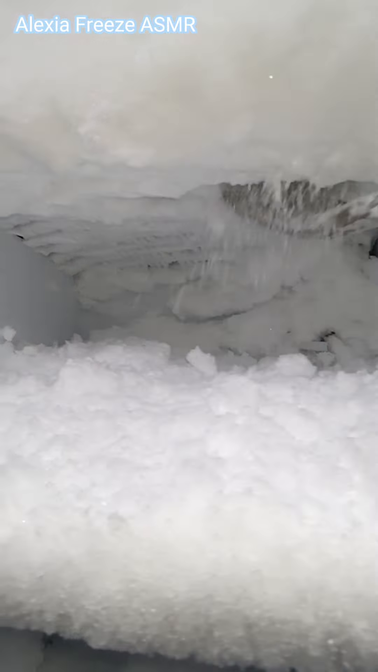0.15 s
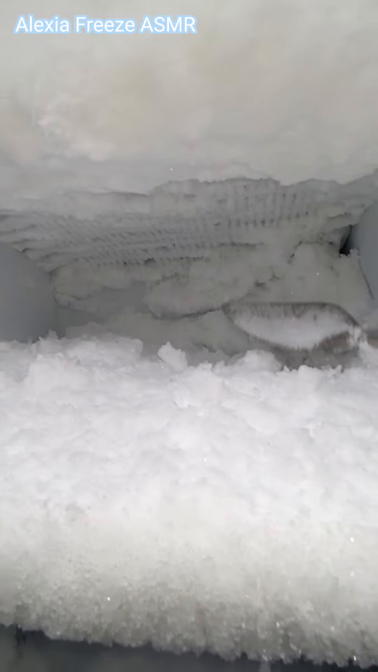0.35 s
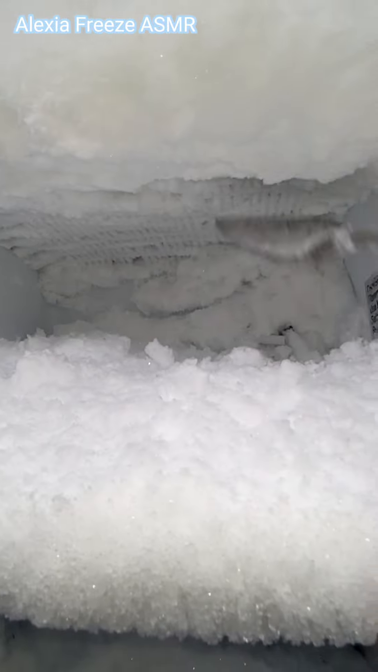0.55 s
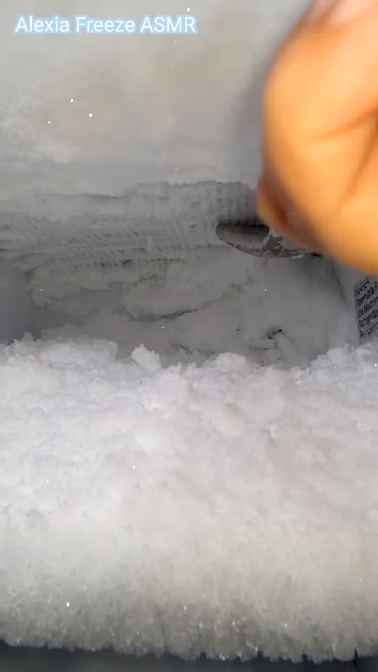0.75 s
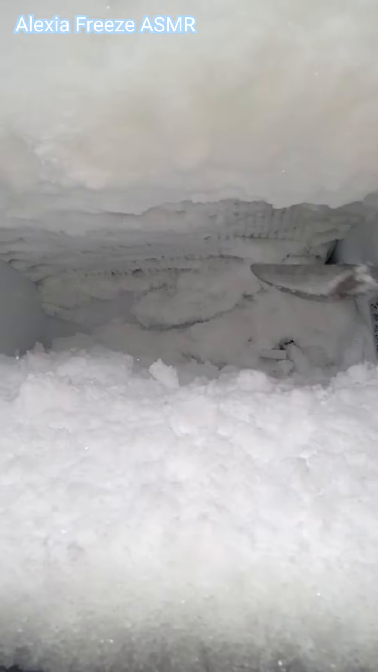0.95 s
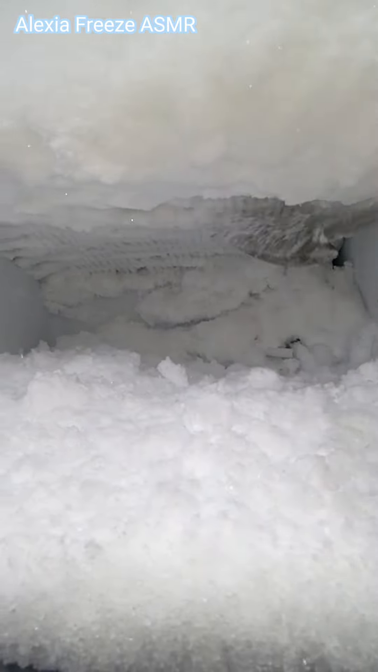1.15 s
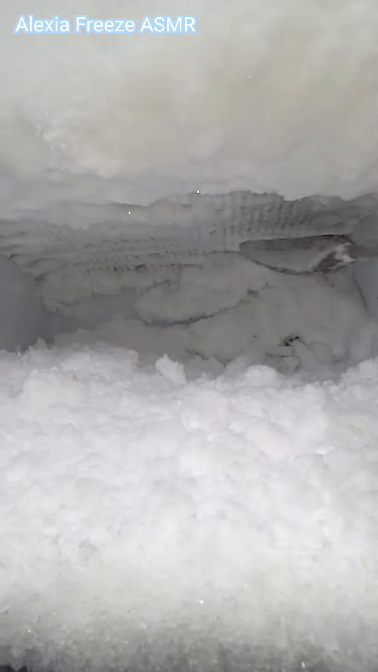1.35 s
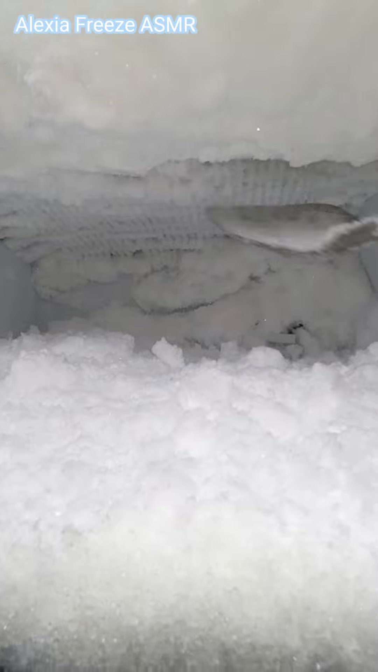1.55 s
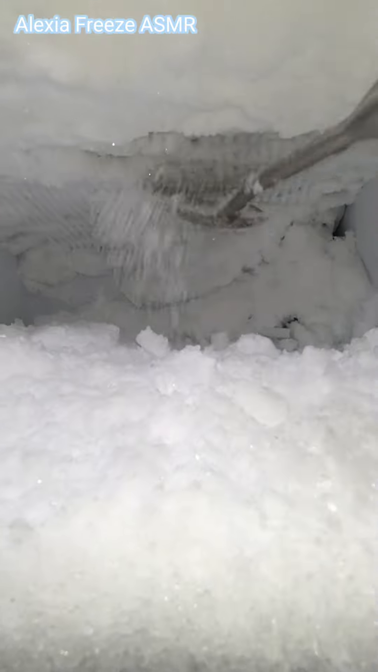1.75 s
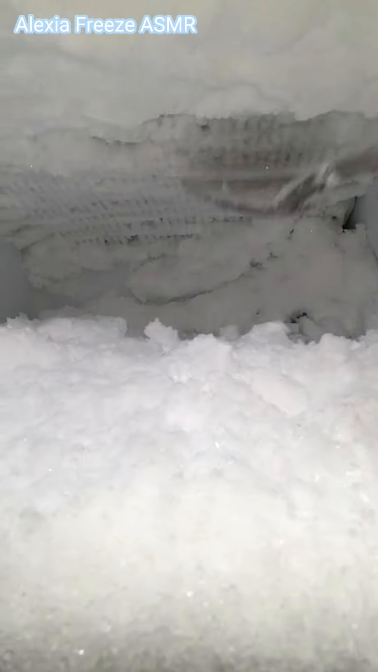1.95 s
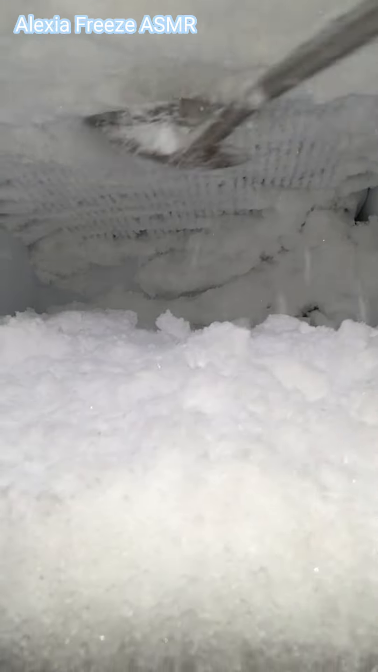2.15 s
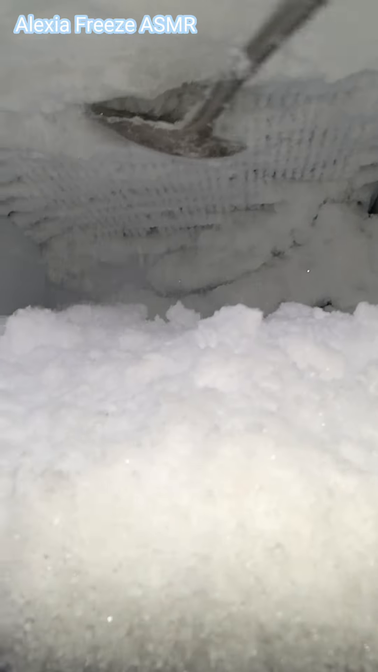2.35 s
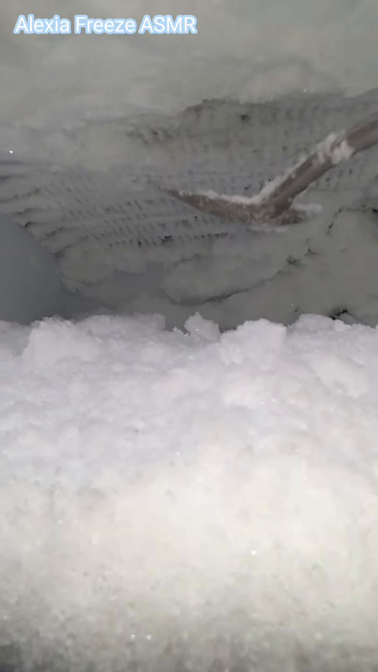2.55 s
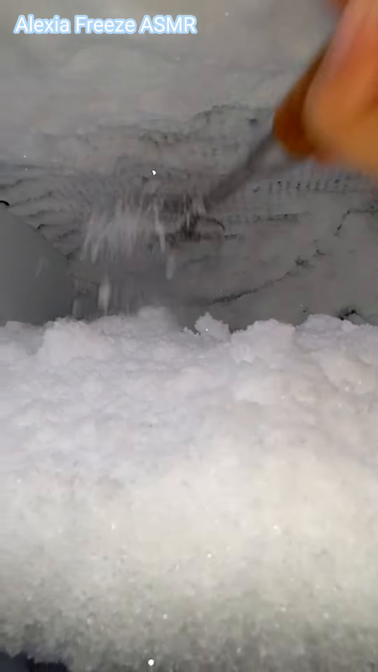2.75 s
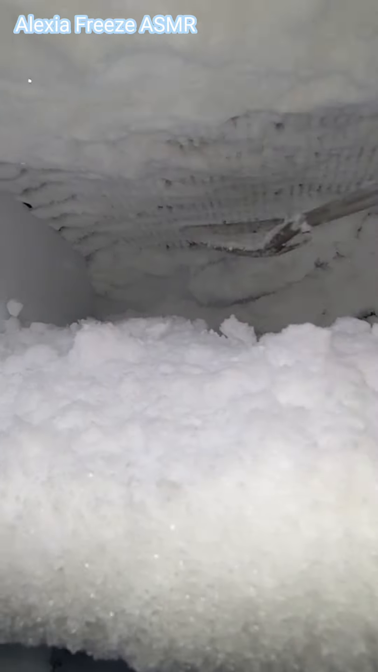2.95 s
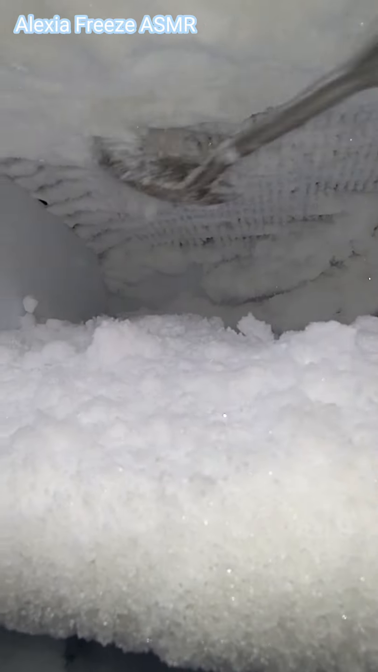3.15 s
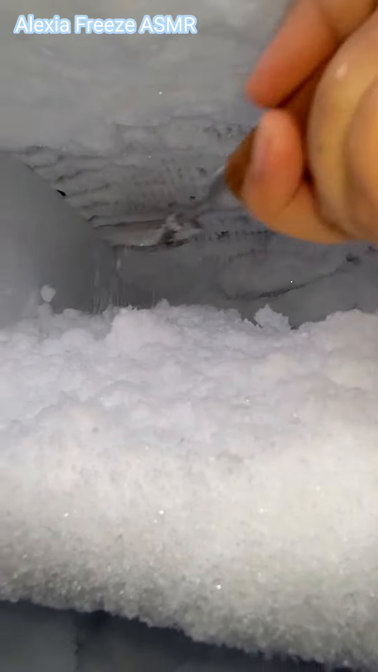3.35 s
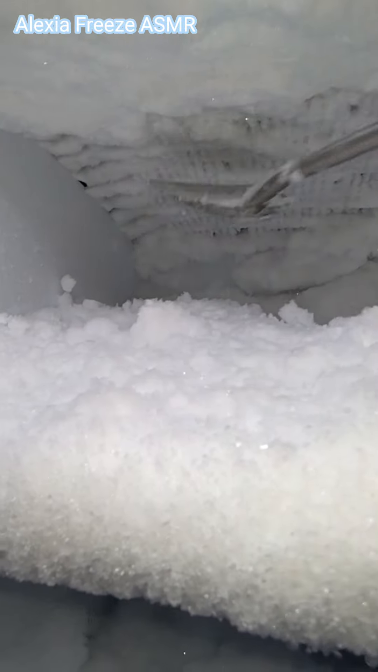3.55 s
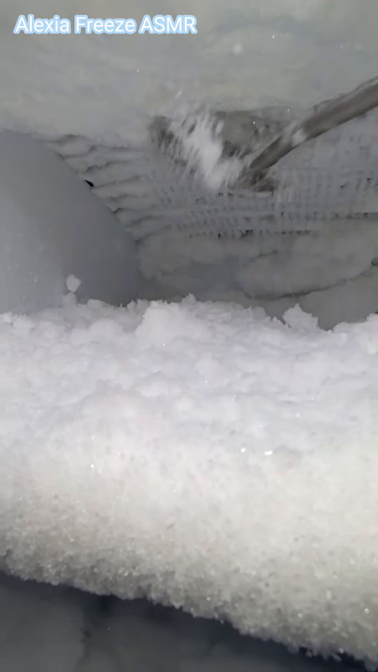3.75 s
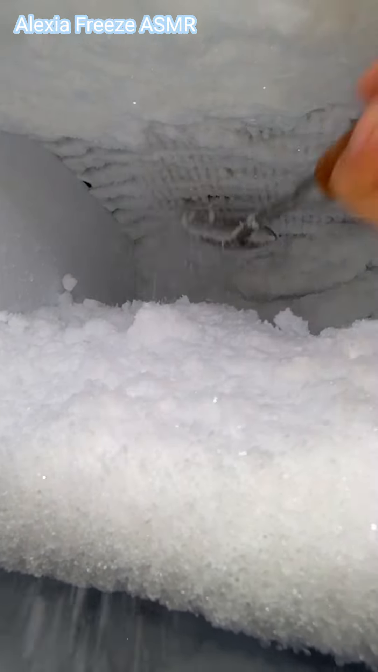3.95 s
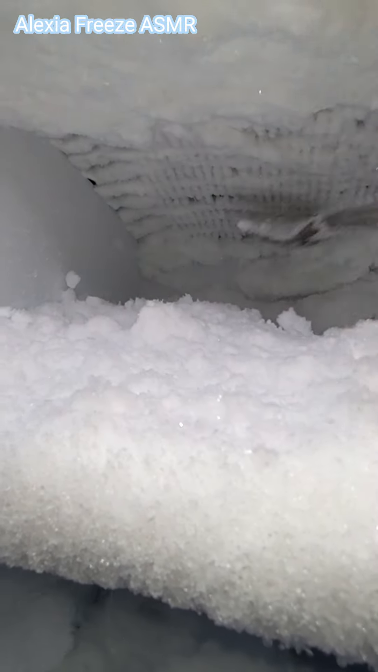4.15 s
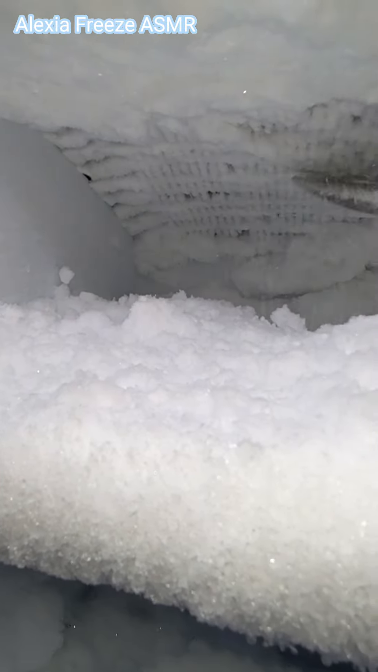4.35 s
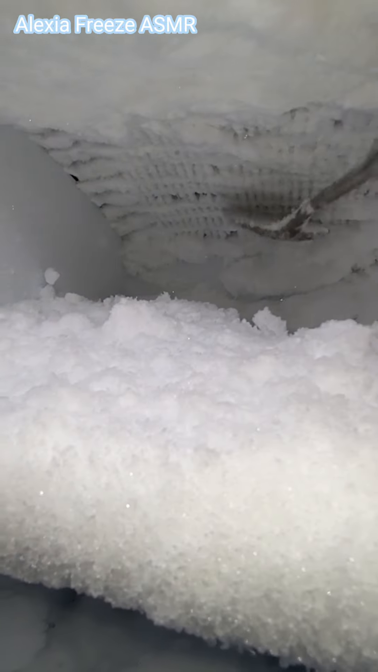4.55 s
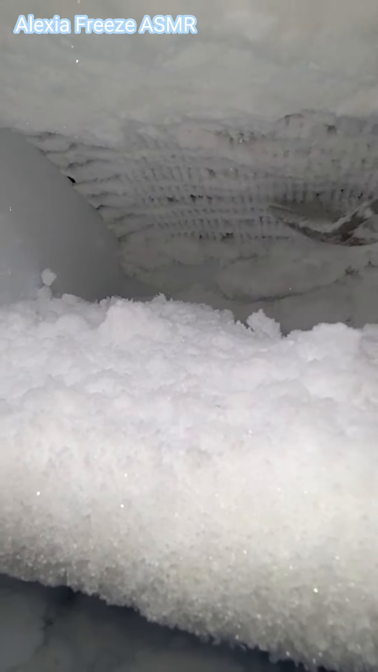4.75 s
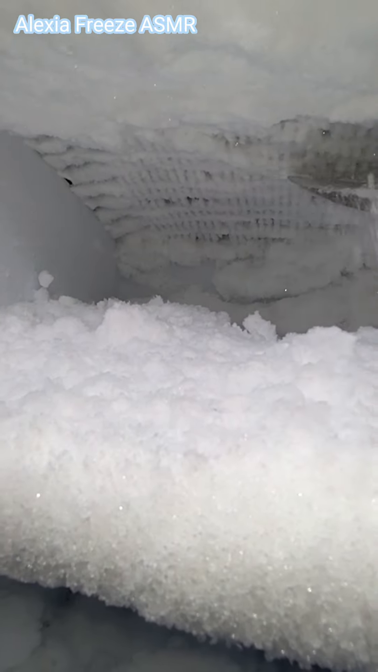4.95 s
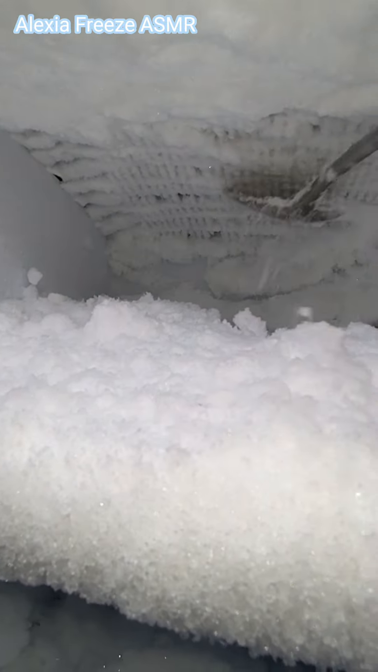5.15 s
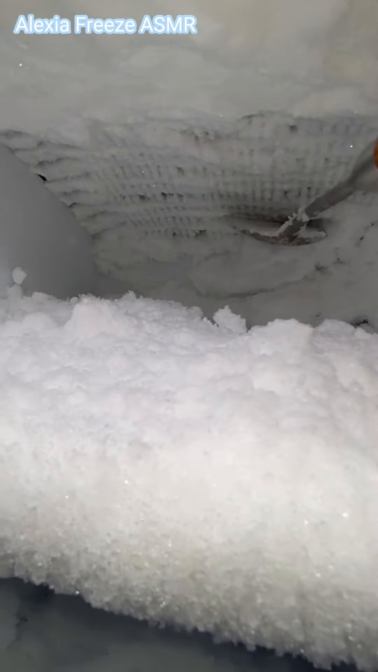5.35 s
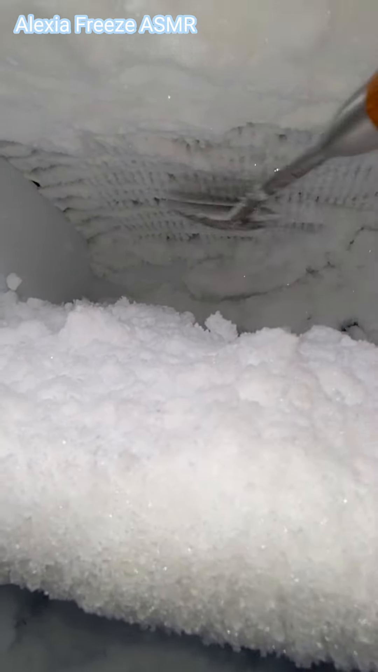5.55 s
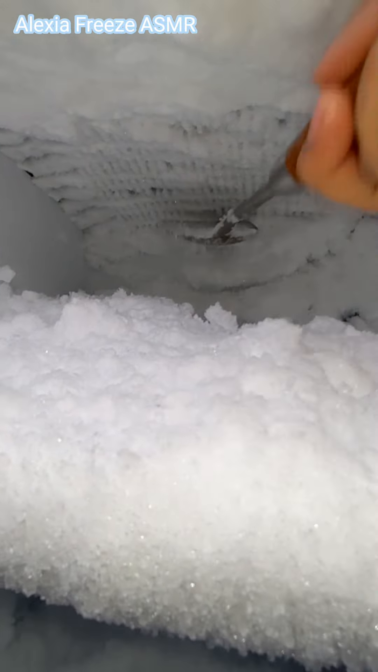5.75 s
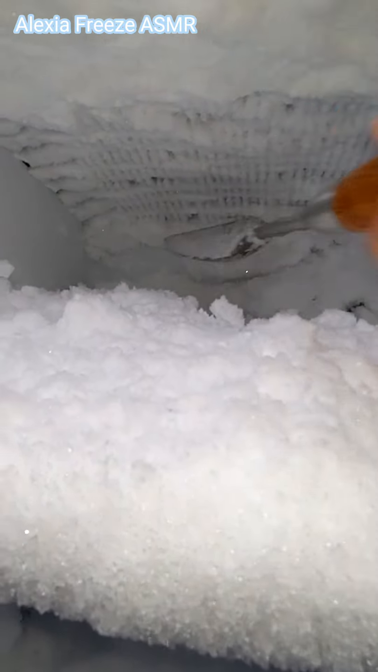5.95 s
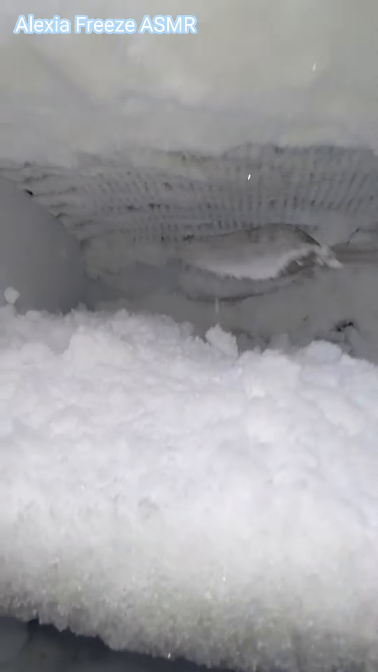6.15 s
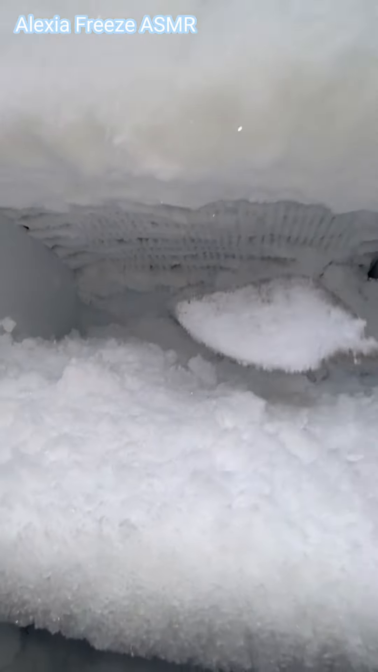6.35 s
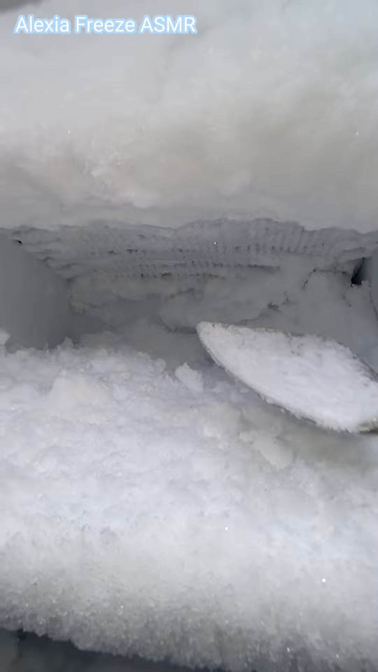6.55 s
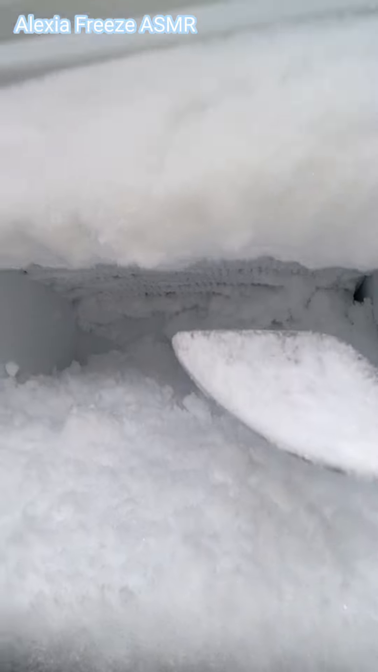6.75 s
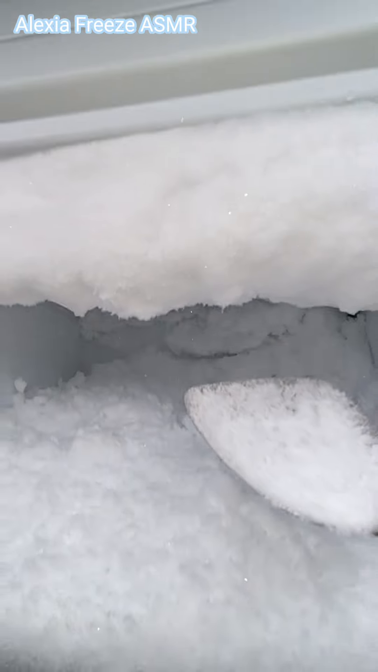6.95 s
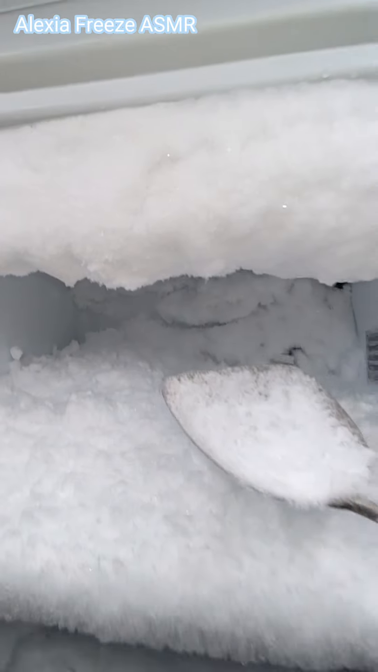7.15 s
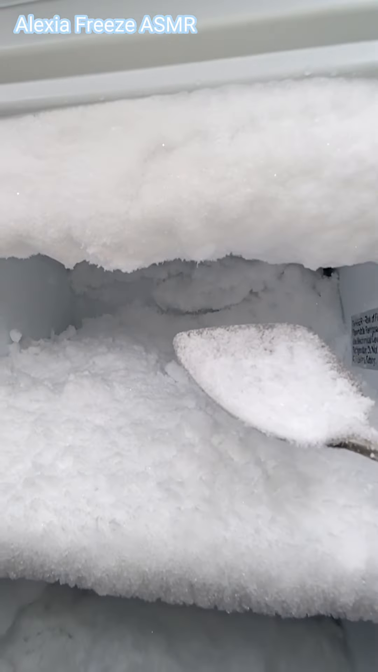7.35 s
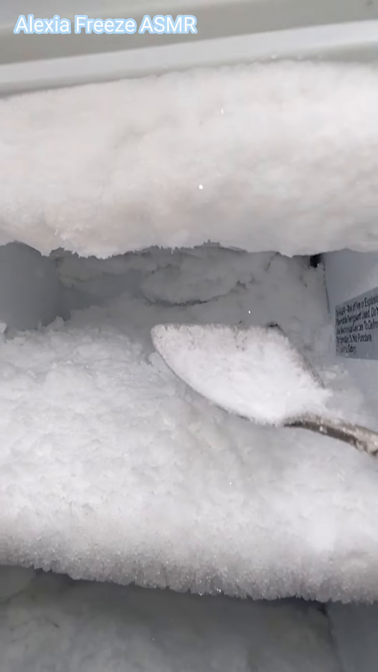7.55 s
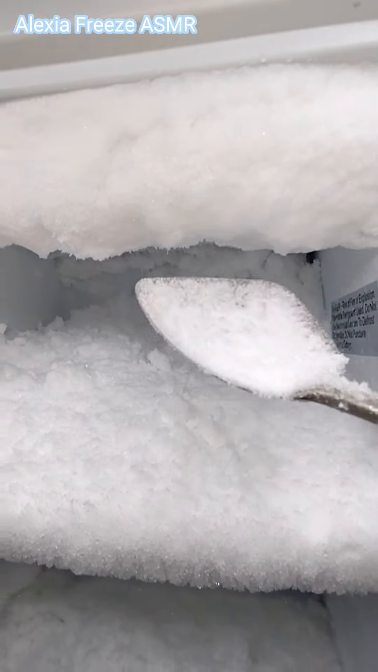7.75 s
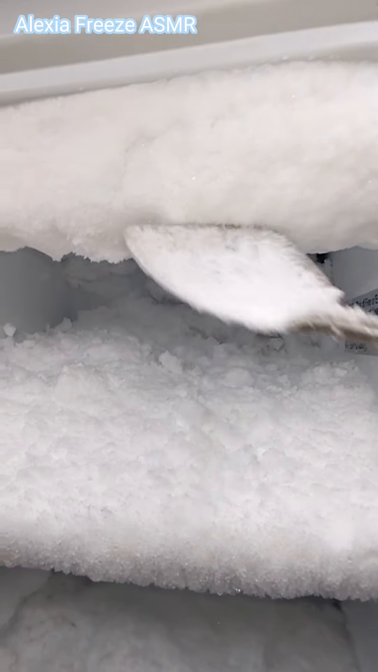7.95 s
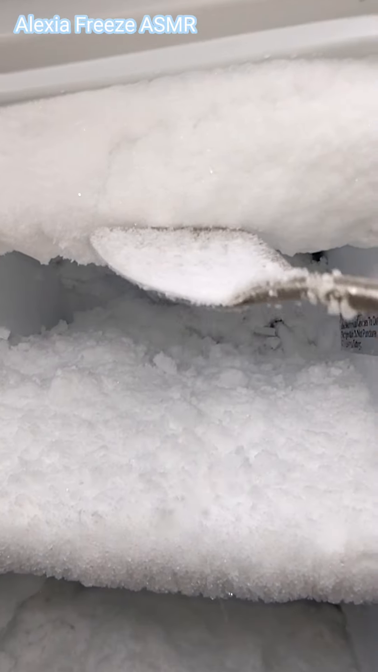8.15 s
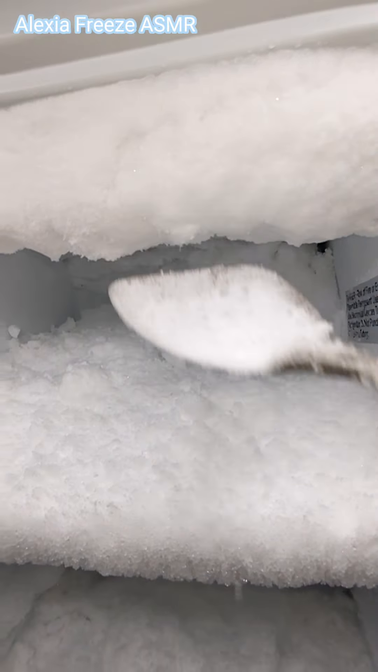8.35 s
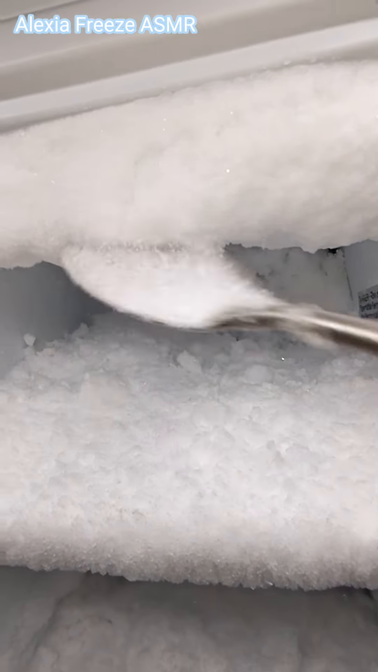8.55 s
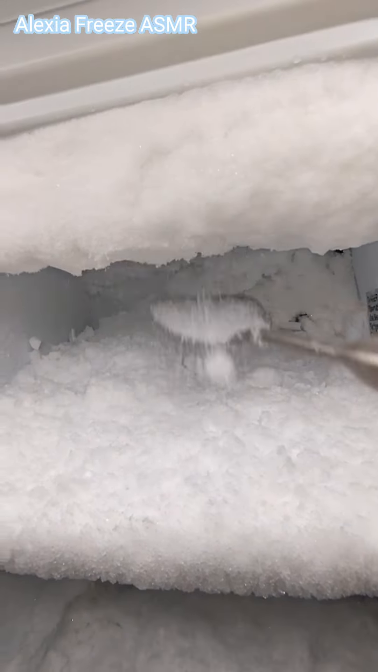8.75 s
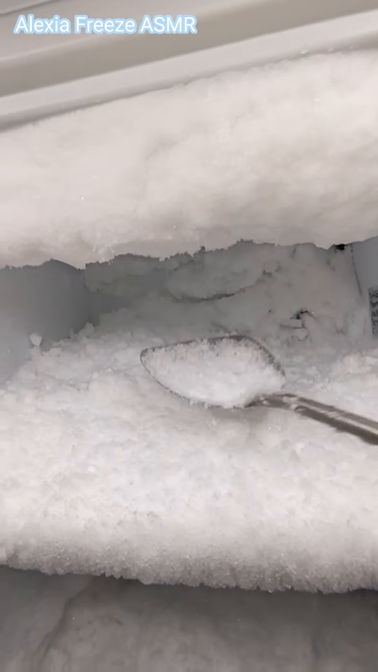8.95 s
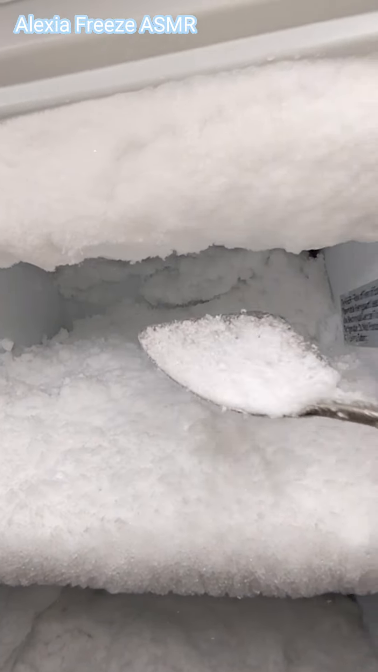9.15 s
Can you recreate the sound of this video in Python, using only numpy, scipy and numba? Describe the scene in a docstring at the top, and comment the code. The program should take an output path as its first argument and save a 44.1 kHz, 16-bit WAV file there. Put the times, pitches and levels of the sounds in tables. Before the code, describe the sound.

A crunchy scrape and a light clink open the sound as a steel spoon digs into frost inside a small freezer, very close to the microphone. Short, uneven strokes follow, about three a second, until around 6 seconds. Each crackles and rasps with breaking ice crystals and a thin metallic ring, while chips snap off and the wall gives a dull, hollow boom. From about 3.6 seconds the strokes run together more densely. Between 6 and 7.9 seconds the scraping pauses, with only a faint soft swell near 6.8 seconds. At 7.9 seconds comes a brighter, closer crunch, then tiny ticks of falling crumbs. Around 8.5 seconds a quick cluster of sharp blows rings the spoon, the peaks clipping slightly. A few crumbs tick until just after 9 seconds. A low compressor hum and soft room hiss continue throughout.

```python
"""First comes a crunchy scrape with a light clink: a steel spoon digs at the frost in a small freezer.
Breaking ice crystals crackle through the spoon and the ice-lined box, and each push booms in the wall.
Chips snap off and crumbs tick. After a pause come a few last, brighter blows; the compressor hums on.
A phone a hand's width away turns itself down under loud strokes and clips the biggest peaks."""
import sys
import numpy as np
from scipy import signal
from scipy.fft import rfft, irfft
from scipy.io import wavfile
from scipy.ndimage import uniform_filter1d
from numba import njit

SR = 44100
rng = np.random.default_rng(int(sys.argv[2]) if len(sys.argv) > 2 else 0)


def store_pcm(level_fs):
    """Save levels as 16-bit WAV."""
    pcm = np.round(np.clip(level_fs, -1, 1) * 32767).astype(np.int16)
    wavfile.write(sys.argv[1], SR, np.atleast_2d(pcm).T)


N = 406161
NEAR_S = 7.5  # from here on the spoon strikes right by the phone


def scrape():
    """The spoon's edge digs and slips in bursts; snapping crystals shake the spoon, frost and box."""
    bite, push, ice, sparkle, rasp, note, steel_hz, box_hz = strokes()
    chip, chip_sparkle, chip_rings = chips()
    judder = np.minimum(wander(70), 1.5)
    snaps, lumps = crackle(12000, spread_db=3), crackle(2500, spread_db=2)
    bursts = undb(2.48 * judder)
    out = pressed_spoon(snaps, bite * bursts * undb(-4.5) + chip * undb(-15), steel_hz)
    out += frost_rasp(snaps, rasp * bursts * undb(-3.5) + chip * undb(-20.5))
    out += fine_grit(snaps, sparkle * bursts * undb(-8) + chip_sparkle * undb(0.5))
    out += icy_box(lumps, ice * undb(2.53 * judder - 1.5), note, box_hz)
    out += chip_rings + clinks() + crumbs()
    return out + box_echo(out) + wall_boom(push)


# The tone of each stroke: (starting steel pitch [Hz], sparkle above bite [dB], ice boost [dB],
# rasp boost [dB], box note [Hz], note above ice [dB])
STROKES = [(4000, -8.5, -0.5, 1.5, 350, 1.5), (4100, -8.5, 2.5, 0, 530, 0), (3900, -25, 3, 9, 480, 12),
           (4000, -11, -0.5, 2.5, 280, -4), (4160, -13, 0, 1, 433, 6), (4200, -19, -2.5, -2.5, 940, 7),
           (3850, -7.5, -1.5, -1.5, 970, -0.5), (3730, -10.5, 2, -1, 540, 4), (4300, 5, 1, -5, 400, 2),
           (4150, -11, 0, 1, 560, 1), (3740, -38, 3.5, 1, 930, -1), (4120, -13.5, 0, 0.5, 670, 4),
           (4000, -12.5, 2, -1.5, 590, 5), (4100, -12, 5, 2, 640, 12), (4000, -11, -1.5, -0.5, 930, 2),
           (4070, -9.5, 3.5, 2.5, 674, 9), (3850, -14, 2.5, 0, 625, 11.5), (4030, -14, -0.5, 0.5, 670, 1),
           (3820, -1, 0.5, -1.5, 720, 1), (3830, -2, -15, -7, 300, 0), (3560, -6, 3.5, -2.5, 640, 9)]
# How hard the hand works, one list a stroke: (time [s], bite of the edge [dB], push on the wall [dB])
EFFORT = [
    [(0.0, -3.5, 0), (.024, -21, -14), (.07, -2.5, -11), (.172, -20.5, -9), (.216, -31, -24),
     (.322, -35, -30), (.334, -14, -17), (.368, -34.5, -24), (.53, -77, -55)],
    [(.547, -6, -14.5), (.571, -17, -4), (.599, -8.5, -15), (.609, -7, -7), (.627, -1, 0),
     (.639, -13, -6.5), (.783, -34.5, -22), (.92, -56, -28)],
    [(.932, -37, -2), (.948, -69, -34), (1.04, -67, -30)],
    [(1.052, -11, -9.5), (1.076, -24, -12), (1.108, -8, -8), (1.238, -36, -17), (1.274, -28, -23.5),
     (1.322, -49.5, -20), (1.47, -37, -32.5), (1.5, -52, -32)],
    [(1.58, -11.5, -6.5), (1.77, -16, -10), (1.786, -10, -25), (1.802, -41, -9), (1.834, -16, -12.5),
     (1.86, -39, -25), (1.93, -44, -30)],
    [(1.939, -6.5, -9), (1.961, -30, -14), (2.045, -38, -42)],
    [(2.057, -13.5, -7.5), (2.147, -13.5, -3.5), (2.257, -30, -16.5), (2.281, -7, -18), (2.291, -38, -27),
     (2.375, -15.5, -19), (2.401, -39, -25), (2.56, -82, -40)],
    [(2.574, -45.5, -2.5), (2.6, -11, -12), (2.658, -18, 0), (2.682, -34, -14), (2.702, -14.5, 2),
     (2.74, -35, -13), (3.0, -42, -34.5)],
    [(3.016, -20.5, -28), (3.028, -48, -33), (3.044, -37, -35)],
    [(3.055, -12, -12), (3.067, -18, -14), (3.115, -6.5, -6.5), (3.159, -14, -4), (3.225, -10.5, -2.5),
     (3.247, -25, -5), (3.35, -36.5, -23)],
    [(3.36, -10, -2), (3.386, -50, -16), (3.418, -37, -10), (3.438, -38, -34), (3.58, -61, -39)],
    [(3.6, -30, 2), (3.62, -21.5, -18), (3.672, -13, -7), (3.838, -12, -3), (3.964, -13.5, -5.5),
     (3.976, -33, -5), (3.99, -11, -12), (4.048, -33, -20), (4.078, -36, -28)],
    [(4.087, -17.5, -15), (4.179, -7.5, -10.5), (4.225, -5, -10), (4.285, -23.5, -11)],
    [(4.293, -19.5, -8.5), (4.367, -12.5, -7.5), (4.565, -17, -7.5), (4.579, -45, -10)],
    [(4.588, -30, -6), (4.599, -13, -19), (4.629, -11.5, -13.5), (4.781, -7.5, -12.5), (4.797, -10.5, -5),
     (4.855, -8, -9), (4.92, -20.5, -18.5)],
    [(4.93, -25, -3), (4.944, -18, -8), (5.238, -16.5, -6), (5.27, -34, -9), (5.3, -23, -25)],
    [(5.31, -16, -40), (5.336, -17, -6.5), (5.472, -9, -21), (5.556, -19.5, -9.5), (5.66, -13, -0.5),
     (5.674, -60, -6)],
    [(5.684, -21, -5), (5.702, -6.5, -7), (5.738, -24.5, -11), (5.878, -44.5, -32), (5.95, -59, -33)],
    [(7.915, -10, -20), (7.949, -11, -12), (7.961, -21, -9.5), (8.179, -46.5, -37)],
    [(8.19, -34, -30), (8.215, -22.5, -21.5), (8.243, -47, -33), (8.35, -53, -48)],
    [(8.515, -6.5, -16), (8.531, -21, 10), (8.543, 6, -2), (8.565, -26, -1), (8.593, -15, -2.5),
     (8.617, -24.5, -12), (8.693, -28.5, -22), (8.757, -34.5, -24.5), (8.827, -40, -37),
     (8.957, -37.5, -44), (9.21, -48, -46)],
]


def strokes():
    """The hand's effort sets six loudness curves; the steel's pitch and the box's note come with them."""
    t, gains = np.arange(N) / SR, np.zeros((6, N))
    steel_hz, box_hz = np.full(N, 4000.), np.full(N, 600.)
    flicker_db = 3 * wander(25) + 3 * wander(90)
    sag_hz_per_s = 800
    for (start_hz, sparkle_db, ice_db, rasp_db, note_hz, note_db), effort in zip(STROKES, EFFORT):
        times, bite_db, push_db = np.transpose(effort)
        started = t > times[0] - .003
        on = started & (t <= times[-1] + .008)
        bite, push = np.interp(t[on], times, bite_db), np.interp(t[on], times, push_db)
        # ice and rasp each follow a blend of bite and push
        ice = bite + 0.6 * (push - bite) - 4.5 + ice_db
        rasp = bite + 0.39 * (push - bite) - 5.5 + rasp_db
        sparkle = bite + sparkle_db + flicker_db[on]
        gains[:, on] = undb([bite, push, ice, sparkle, rasp, ice + note_db])
        steel_hz[on] = start_hz - sag_hz_per_s * (t[on] - times[0])
        box_hz[started] = note_hz
    return (*gains, steel_hz * (1 + 0.039 * wander(16)), box_hz)


# The tone of crunching frost: (frequency [Hz], level [dB])
CRUNCH_TONE = [(1530, -43), (2600, -4), (3690, 6.5), (4010, 12), (5520, -5.5), (5980, -32), (6250, -27),
               (7500, -14), (9750, -64), (16500, -120)]
# Notes of the spoon's bowl held against the ice: (pitch [Hz], width [Hz], level [dB])
BOWL_NOTES = [(3070, 126, -5.5), (3280, 50, -0.5), (3427, 110, -5), (3943, 130, -4.5), (4103, 166, -1),
              (4410, 230, -10.5), (4766, 69, -1.5), (5036, 120, -5), (5930, 214, -14), (6620, 100, -12.5),
              (7040, 120, -18), (8300, 90, -45), (9300, 150, -47)]


def pressed_spoon(snaps, gain, steel_hz):
    """Crystals crunch under the edge and ring the bowl; the grip brings out one sliding note."""
    drive = snaps * gain
    bowl = undb(13) * resonate(drive, BOWL_NOTES, shift_db=4.5, drift=.008, rate=22)
    crunch = undb(-0.5) * shaped_crackle(snaps, gain, CRUNCH_TONE)
    return crunch + bowl + undb(6.5) * moving_ring(drive, steel_hz, 170.)


# The tone of the dragging edge: (frequency [Hz], level [dB])
RASP_TONE = [(710, -29), (1200, -5), (1430, 1.5), (1600, -4), (2540, -11), (2800, -19.5), (3640, -25),
             (6160, -120)]
# Notes of the spoon's handle and the frost crust: (pitch [Hz], width [Hz], level [dB])
CRUST_NOTES = [(1426, 42, -0.5), (1760, 275, -5.5), (1954, 44, 4.5), (2078, 210, -4), (2628, 150, -5)]


def frost_rasp(snaps, gain):
    """Dragging the edge makes a lower rasp that rings in the handle and the crust."""
    crust = undb(14) * resonate(snaps * gain, CRUST_NOTES, shift_db=2.5, drift=0.0073, rate=20)
    return undb(-4) * shaped_crackle(snaps, gain, RASP_TONE) + crust


# The tone of fine grit, before and after NEAR_S: (frequency [Hz], level [dB])
SPARKLE_TONE = [(3800, -21.5), (6500, 1), (7500, -6), (9000, -5), (11400, -11), (14700, -22), (15500, -28)]
NEAR_SPARKLE_TONE = [(3820, -15), (6500, -3), (7850, 0), (9000, 2), (9960, -1), (15000, -16)]


def fine_grit(snaps, gain):
    """Fine grit sparkles and sings in the bowl's highest notes; it sounds brighter up close."""
    near = np.arange(N) > NEAR_S * SR
    high_notes = [note for note in BOWL_NOTES if note[0] > 5500]
    out = undb(18.5) * resonate(snaps * gain, high_notes, shift_db=3, drift=.01, rate=21)
    out += shaped_crackle(snaps, gain * ~near, SPARKLE_TONE)
    return out + undb(-3) * shaped_crackle(snaps, gain * near, NEAR_SPARKLE_TONE)


# The dull tone of the ice layer: (frequency [Hz], level [dB])
ICE_TONE = [(120, -24), (200, -11), (232, -10), (317, 5), (524, -1.5), (642, 0), (907, -7), (1190, -21),
            (1300, -16), (1690, -54.5), (2860, -120)]
# Hollow notes of the ice-lined box: (pitch [Hz], width [Hz], level [dB])
BOX_NOTES = [(272.5, 13, -8.5), (327.4, 13.5, 5.5), (419.5, 5.4, -3.5), (598, 7.5, -2), (672.3, 24.4, 0),
             (758, 20.4, -1.5), (1032, 41, -9)]


def icy_box(lumps, gain, note_gain, note_hz):
    """Coarser crackle shakes the ice and the box; each scraped spot has a note of its own."""
    hollow = undb(17.5) * resonate(lumps * gain, BOX_NOTES, shift_db=-1, drift=0.043, rate=16)
    spot = undb(7.5) * moving_ring(lumps * note_gain, note_hz * (1 + .06 * wander(12)), 80.)
    return shaped_crackle(lumps, gain, ICE_TONE) + hollow + spot


# Deep notes of the freezer wall: (pitch [Hz], width [Hz], level [dB])
WALL_NOTES = [(105.5, 30, -7.5), (136.9, 39.5, -10), (186.6, 113, -21.5), (75.6, 100, -16)]


def wall_boom(push):
    """Slow shoves of the edge flex the wall; its main note wavers as the load bends it."""
    shoves = crackle(400, spread_db=1.5)
    boom_hz = 130 * (1 + 0.079 * wander(6))

    def panel(x):
        main = moving_ring(moving_ring(x, boom_hz, 26.4), boom_hz, 37.)
        return main + sum(undb(db) * ring(ring(x, hz, width), hz, 3 * width)
                          for hz, width, db in WALL_NOTES)

    return undb(2) * panel(shoves * push) / panel(shoves).std()


# Chips of ice breaking off: (time [s], strength [dB], hollow knock above strength [dB])
CHIPS = [(.0568, -10, -16), (0.144, 8, -27), (0.2784, -21, -24), (.331, -3, -14), (0.5432, 4, -21),
         (0.607, -1, -15), (0.7164, -28, 0), (.745, -18, -3), (.759, -14, -7), (0.9286, -26, 12.5),
         (1.049, -7, -16), (1.1005, -16, -14), (1.135, 4, -15), (1.2091, -1, -15.5), (1.246, -12, -18),
         (1.276, -21, -10), (1.5757, -1, -19), (1.6225, 8, -25), (1.704, -3.5, 3), (1.78, 9, -17),
         (1.829, 4.5, -15.5), (1.934, 0, -23), (2.0526, 1.5, -24), (2.2738, -7, -18), (2.3337, -14, -13),
         (2.3551, -2.5, -13), (2.4702, -19, -21), (2.57, -19, -5), (2.584, 12, -15.5), (2.6525, 1.5, -3),
         (2.702, 0, 1), (3.014, -23, -16), (3.056, 3.5, -5.5), (3.0859, -3, -6), (3.19, -1, -2),
         (3.2833, -7.5, 5.5), (3.3567, -2, -5), (3.4137, -3.5, -26), (3.5981, 9, -11.5), (3.782, -1, 1.5),
         (3.9888, -12, -13), (4.0844, 10.5, -18), (4.121, -2, -14), (4.2973, -12, 2), (4.6003, -4, 1.5),
         (4.6556, -1, -11), (5.0663, 0, -9), (5.3186, 0, -6.5), (5.3573, 6, -9), (5.4103, 0, -28),
         (5.444, 2, -24), (5.546, -2.5, 3.5), (5.694, 1, -5), (6.4336, -27, -18), (7.9099, 0.5, -31),
         (7.996, -7.5, -4), (8.211, -11.5, -30), (8.5145, 0, -3), (8.542, 4, -3), (8.587, 9.5, -25),
         (8.76, -9.5, -14), (8.905, -31, -6), (9.0797, -25, -12)]


def chips():
    """Each chip gives a sudden burst of crunch and sparkle (two gain curves) and rings bowl and box."""
    gains, rings = np.zeros((2, N)), np.zeros(N)
    rise_s, fade_s = 0.00033, 0.025
    fade = undb(-60 * np.linspace(0, 1, int(fade_s * SR)))
    fade *= np.minimum(1, np.arange(len(fade)) / (rise_s * SR))
    for start, level_db, knock_db in CHIPS:
        sparkle_db = (-16 if start > NEAR_S else -26.5) - 0.34 * level_db  # big chips are duller
        add(gains, start, undb([[level_db], [level_db + sparkle_db]]) * fade)
        for hz, _, db in BOWL_NOTES:
            add(rings, start, ping(hz, level_db + db - 20 + rng.normal(0, 5.8), 0.044))
        for hz, _, db in BOX_NOTES:
            add(rings, start, ping(hz, level_db + knock_db + db - 13.5 + rng.normal(0, 4), 0.16))
    return (*gains, rings)


# Notes of the spoon ringing freely: (pitch [Hz], level [dB], ring time [s])
FREE_SPOON_NOTES = [(3058, -18, .45), (3277, -7, .4), (3318, 0, .46), (5125, -6, .42), (7063, -22, .3),
                    (8682, -22, .2)]
# Blows that let the spoon swing free: (time [s], level [dB], ring time multiplier [ratio])
CLINKS = [(.004, -21, .7), (.1434, -18, .5), (1.8307, -27, .25), (8.2137, -34, .35), (8.514, -19, .9),
          (8.5415, -16, 1.1), (8.5889, -19, 1.1), (8.9047, -41, .6)]


def clinks():
    """The free spoon rings with all its notes, in a slightly different mix at each blow."""
    out = np.zeros(N)
    for start, level_db, freedom in CLINKS:
        for hz, db, ring_s in FREE_SPOON_NOTES:
            add(out, start, ping(hz, level_db + db + rng.normal(0, 1.5), ring_s * freedom))
    return out


# Crumbs of frost dropping off the spoon: (time [s], level [dB])
CRUMBS = [(.8574, -27), (2.5122, -19), (2.5353, -26), (5.909, -31), (8.0344, -12), (8.0611, -20),
          (8.108, -25), (8.2975, -28), (8.315, -30), (8.3784, -35), (8.4602, -30), (8.484, -28),
          (8.65, -19), (8.7116, -35), (8.8543, -29), (8.8694, -38), (8.9635, -36), (9.0166, -30),
          (9.0414, -49)]


def crumbs():
    """Each crumb makes a tiny bright tick: a click and a brief ping of its own pitch."""
    out, clicks = np.zeros(N), np.diff(rng.standard_normal((len(CRUMBS), 257)))
    fade_db = np.linspace(0, -60, clicks.shape[1])
    for (start, level_db), click in zip(CRUMBS, clicks):
        add(out, start, ping(rng.uniform(5560, 8000), level_db - 9, 0.017))
        add(out, start, click * undb(level_db - 6 + fade_db))
    return out


def box_echo(sound, ring_s=0.093, level_db=-11.5):
    """The box throws the crackle back as a short, blurred echo."""
    t = np.arange(int(ring_s * SR)) / SR
    tail = rng.standard_normal(SR)[:len(t)] * undb(-60 * t / ring_s)
    tail /= np.linalg.norm(tail)
    return undb(level_db) * signal.oaconvolve(sound, tail)[:N]


# The compressor's hum: (multiple of the shaft's speed [ratio], level [dB])
HUM_NOTES = [(1, -29.5), (3, -49.5), (5, -50), (8, -71), (10, -55), (12, -56.5), (13, -74), (14, -75),
             (15, -96), (30, -57), (31, -63), (32, -74), (33, -78), (34, -61), (38, -60), (66, -58.5)]
# Unsteady drones of the cabinet: (pitch [Hz], width [Hz], level [dB])
DRONES = [(26.3, 15, -24.5), (111.3, 8.2, -27), (132, 7.3, -39), (90, 32, -34.5)]


def compressor(shaft_hz=59.6):
    """The spinning shaft hums with gently wavering tones while the cabinet drones along."""
    t, out = np.arange(N) / SR, np.zeros(N)
    for multiple, db in HUM_NOTES:
        gain = np.sqrt(2) * undb(db + 1.5 * wander(2.2))
        out += gain * np.sin(2 * np.pi * (multiple * shaft_hz * t + rng.random()))
    for hz, width, db in DRONES:
        band = ring(rng.standard_normal(N), hz, width)
        out += undb(db) * unit(ring(band, hz, 2 * width))
    return out


# The tone of the kitchen air: (frequency [Hz], level [dB])
AIR_TONE = [(82, -27), (140, 4.5), (259, -7), (297, -0.5), (400, -1.5), (479, -2), (550, -8.5), (698, -6.5),
            (1170, -13), (1770, -11.5), (2120, -14.5), (3990, -15.5), (5710, -24), (14800, -35),
            (16000, -47)]


def kitchen_air(level_db=-39):
    """The room hisses softly, drifting a little in loudness."""
    return undb(level_db + wander(3)) * unit(colour(rng.standard_normal(N), AIR_TONE))


# The rise and fall of a faint swell: (time [s], level [dB])
SWELL = [(6.6, -57), (6.76, -41.5), (6.88, -46), (6.92, -65), (7.0, -70)]


def swell():
    """Soft noise in two mid-pitched bands comes and goes while the spoon is carried."""
    times, db = np.transpose(SWELL)
    hiss = rng.standard_normal(N)
    bands = unit(ring(hiss, 1470, 300) + undb(1) * ring(hiss, 1030, 80))
    return bands * undb(np.interp(np.arange(N) / SR, times, db, left=-99, right=-99))


def crackle(rate, spread_db):
    """About `rate` crystals snap each second, some bigger than the rest but none huge."""
    chance, size, sign = rng.random(N), rng.exponential(size=N), rng.standard_normal(N)
    return unit((chance < rate / SR) * undb(spread_db * np.minimum(size, 4.5)) * np.sign(sign))


def shaped_crackle(snaps, gain, tone):
    """Crackle with the given tone, its loudness set by `gain`."""
    return colour(snaps * gain, tone) / colour(snaps, tone).std()


def resonate(x, notes, shift_db, drift, rate):
    """The shifting contact point rings notes by turns and bends them; neighbours swing opposite ways."""
    out = np.zeros(N)
    for k, (hz, width, db) in enumerate(notes):
        drive = x * undb(db + shift_db * wander(rate))
        out += (-1) ** k * moving_ring(drive, hz * (1 + drift * wander(rate / 2)), float(width))
    return out


def colour(x, tone):
    """Filters x to the given tone, so that each click rings only after it lands."""
    hz, db = np.transpose(tone)
    bins = np.maximum(np.arange(2049) * SR / 4096, 1)
    cepstrum = irfft(np.interp(np.log(bins), np.log(hz), db) * np.log(10) / 20)
    cepstrum[1:2048] *= 2  # fold the late half of the cepstrum onto the early half
    cepstrum[2049:] = 0
    return signal.oaconvolve(x, irfft(np.exp(rfft(cepstrum))))[:N]


def ring(x, hz, width_hz):
    """Lets through a band around one pitch."""
    return signal.lfilter(*signal.iirpeak(hz, hz / width_hz, SR), x)


@njit
def moving_ring(x, hz, width_hz):
    """Lets through a band around a pitch that moves."""
    out, band_state, low_state = np.empty(len(x)), 0., 0.
    for i in range(len(x)):
        step, damping = np.tan(np.pi * hz[i] / SR), width_hz / hz[i]
        band = (band_state + step * (x[i] - low_state)) / (1 + step * (step + damping))
        band_state = 2 * band - band_state
        low_state += 2 * step * band
        out[i] = damping * band
    return out


def ping(hz, db, ring_s):
    """One struck note that fades by 60 dB in its ring time."""
    t = np.arange(int(ring_s * SR)) / SR
    return undb(db - 60 * t / ring_s) * np.sin(2 * np.pi * hz * t)


def wander(rate):
    """Glides to a new random value `rate` times a second, typically about 1 away from zero."""
    hold = int(SR / rate)
    held = rng.standard_normal(1000)[np.arange(N) // hold]
    return 1.38 * uniform_filter1d(held, hold // 2)


def add(out, start, sound):
    """Mixes a short sound in at `start` seconds."""
    part = out[..., int(start * SR):int(start * SR) + sound.shape[-1]]
    part += sound[..., :part.shape[-1]]


def undb(db):
    """Turns decibels into a multiplier."""
    return 10 ** (np.asarray(db) / 20)


def unit(x):
    """Scales a sound to an average power of 1."""
    return x / np.sqrt(np.mean(x ** 2))


@njit
def loudness(x, rise_s, fall_s):
    """Follows how loud x is, at one speed going up and another going down."""
    level, out = 0., np.empty(len(x))
    for i in range(len(x)):
        level += (abs(x[i]) - level) / (SR * (rise_s if abs(x[i]) > level else fall_s))
        out[i] = level
    return out


def scene():
    """The scraping spoon over its quiet background, in one channel."""
    return (undb(2) * scrape() + compressor() + kitchen_air() + swell())[None]


def record(dry, threshold_db=-14.5, top_hz=15500):
    """The phone turns loud strokes down, clips the peaks and cuts the highest treble."""
    level = loudness(dry[0], rise_s=0.0032, fall_s=0.2)
    ducked = dry * np.minimum(1, undb(threshold_db) / (level + 1e-9)) ** 0.26
    clipped = ducked / (1 + np.abs(ducked) ** 9) ** (1 / 9)
    return signal.sosfilt(signal.ellip(12, .2, 80, top_hz, fs=SR, output="sos"), clipped)


dry = scene()
out = record(dry)
store_pcm(out)
```